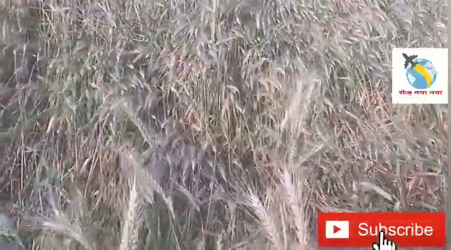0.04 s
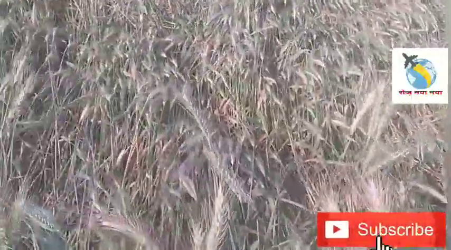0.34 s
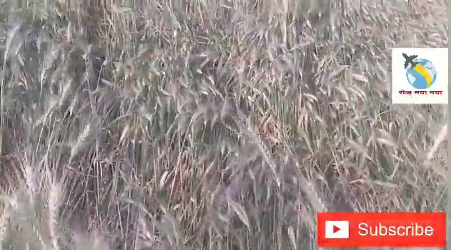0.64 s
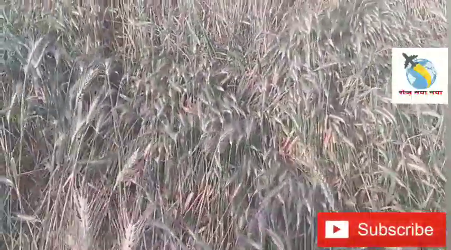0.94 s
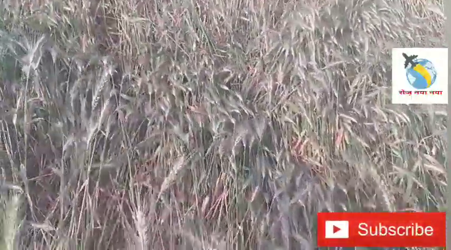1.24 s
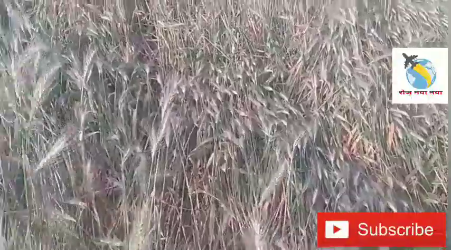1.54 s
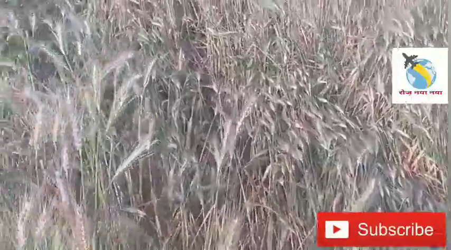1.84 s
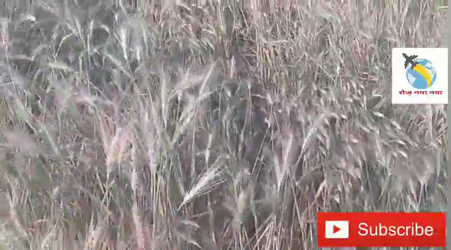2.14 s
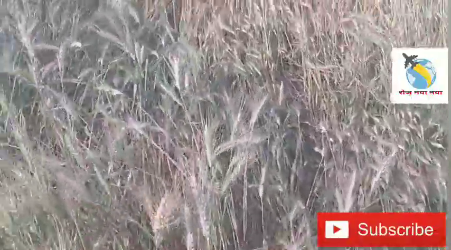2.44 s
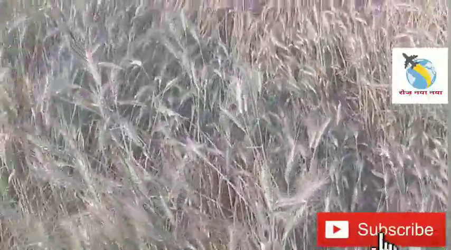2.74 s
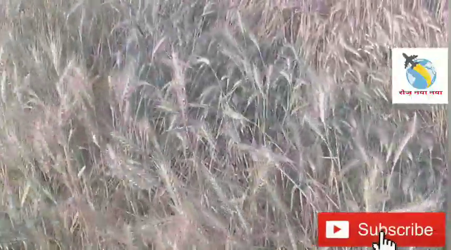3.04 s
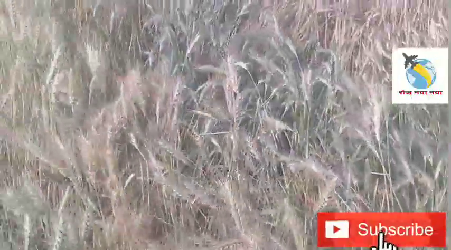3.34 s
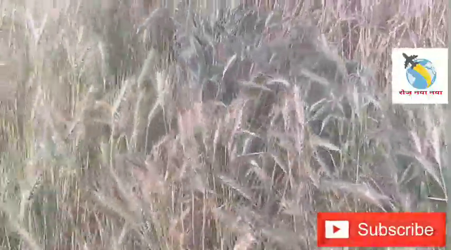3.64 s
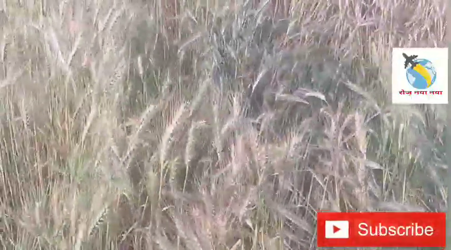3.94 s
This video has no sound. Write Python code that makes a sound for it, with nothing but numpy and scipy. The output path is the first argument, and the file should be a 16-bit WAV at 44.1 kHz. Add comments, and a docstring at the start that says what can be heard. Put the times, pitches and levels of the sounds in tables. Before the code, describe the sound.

Gusty wind rumbles on the microphone while wheat rustles and small birds chirp faintly.

```python
"""Wind in a ripe wheat field. At first turbulent eddies buffet the left microphone port, while ears hiss
and stalks brush past each other close by and small birds whistle further off to the right. After 1.5 s
the eddies die away and the wheat rustles on. From 2 s they return; faint low calls carry from the
distance and the whistles come more often. At 3.5 s the wind swells to a strong, thumping gust."""
import sys
import numpy as np
from scipy import signal
from scipy.fft import rfft, irfft
from scipy.io import wavfile
from scipy.ndimage import uniform_filter1d, map_coordinates

SR = 44100
rng = np.random.default_rng(int(sys.argv[2]) if len(sys.argv) > 2 else 0)


def master(y):
    """Save y as 16-bit WAV."""
    cut = np.clip(np.atleast_2d(y).T, -1, 1)
    pcm = np.round(cut * 32767)  # scale
    wavfile.write(sys.argv[1], SR, pcm.astype(np.int16))


N = 176400
TIME = np.arange(N) / SR

# Steady push of the wind on the left port: t/s, level/dB before trim
LEFT_BREEZE = [(0, -36), (0.1, -43), (0.25, -44.5), (0.5, -37), (0.62, -32.5), (0.8, -35.5), (.95, -32),
               (1.15, -39), (1.35, -31), (1.53, -36), (1.65, -55.5), (1.95, -56), (2.06, -41.5),
               (2.5, -48.5), (2.8, -36.5), (2.95, -42.5), (3.12, -27.5), (3.43, -33), (3.5, -26.5),
               (3.6, -24), (3.7, -17.5), (3.8, -19.5), (4, -19)]
# Single eddies striking the left port: centre t/s, duration/s, level/dB before trim
LEFT_BUFFETS = [(0.022, 0.0369, -30), (0.177, 0.0206, -18.5), (0.295, 0.01904, -28.5),
                (0.375, 0.02044, -26.5), (0.439, 0.02596, -21.5), (0.552, 0.02703, -22.5),
                (0.589, 0.0262, -25.5), (0.625, 0.0143, -26.5), (0.666, 0.02664, -27.0),
                (0.697, 0.02394, -26), (0.789, 0.02268, -24), (0.825, 0.0172, -26.0), (0.886, 0.0209, -25),
                (0.909, 0.0194, -23.5), (0.939, 0.02693, -20.0), (0.976, 0.0167, -22),
                (1.071, 0.018, -25.5), (1.136, 0.031, -30.0), (1.201, 0.01725, -31),
                (1.288, 0.04485, -23.5), (1.36, 0.02166, -21.5), (1.39, 0.01494, -21.0),
                (1.465, 0.028, -24), (1.512, 0.018, -23), (2.051, 0.0308, -29.5), (2.269, 0.0274, -32.0),
                (2.366, 0.03057, -32.5), (2.444, 0.0228, -29.0), (2.591, 0.0306, -31.0),
                (2.647, 0.03637, -28.5), (2.782, 0.04, -24.5), (2.848, 0.05125, -30.0),
                (2.908, 0.0229, -29), (3.034, 0.0227, -22.5), (3.085, 0.01615, -20.5),
                (3.112, 0.02553, -17), (3.193, 0.01958, -21.5), (3.238, 0.0585, -23.5),
                (3.302, 0.0526, -24.5), (3.37, 0.01353, -22), (3.42, 0.0285, -27.5), (3.486, 0.036, -18),
                (3.562, 0.045, -16), (3.641, 0.0269, -15), (3.679, 0.02868, -11), (3.728, 0.035, -12),
                (3.77, .018, -16), (3.829, 0.028, -12.5), (3.878, 0.02665, -16.5), (3.928, 0.055, -13.5)]
# Push of the wind on the sheltered right port: t/s, level/dB
RIGHT_BREEZE = [(0, -58.5), (.12, -61), (.17, -36), (.22, -54.5), (.34, -47.5), (.46, -67), (1.9, -68),
                (1.97, -46), (2.03, -65.5), (2.92, -68), (3.0, -44.5), (3.1, -61.5), (3.55, -63),
                (3.78, -54), (4, -60)]
def wind(trim_db=-.5, flutter_db=3, flutter_hz=36.32, rumble_cut_hz=54.64):
    """Wind noise: turbulent pressure acts directly on the ports, far more on the exposed left one."""
    flutter = flutter_db * drift(flutter_hz).clip(-2, 1)
    push = from_db(in_time(LEFT_BREEZE) + trim_db + flutter)
    for centre, length, db in LEFT_BUFFETS:
        bell = .5 ** ((2 * (TIME - centre) / length) ** 2)
        push = np.maximum(push, from_db(db + trim_db) * bell)
    flow = port_turbulence(push, reference_db=-22)
    left = flow + rim_crackle(flow) + thumps()
    right = port_turbulence(from_db(in_time(RIGHT_BREEZE)), reference_db=-46)
    return butterworth([left, right], 3, rumble_cut_hz, "high")


# Spectrum of the turbulence when the push is at the reference level: f/Hz, relative level/dB
EDDY_SPECTRUM = [(20, -53.5), (50, -16), (90, 4), (140, 4.5), (220, 4), (310, -3.5), (430, -11.5),
                 (600, -31.5), (900, -43), (1400, -48), (2500, -78.5), (6000, -120)]
def port_turbulence(push, reference_db, db_per_octave=28, churn_db=1.5, churn_hz=122.4):
    """Convection of eddies: a harder push carries them past the port faster, so louder and higher."""
    push = push * rms_one(from_db(churn_db * drift(churn_hz)))  # quick lumps inside the flow
    speed = 2 ** ((20 * np.log10(push) - reference_db) / db_per_octave)
    eddies = noise(EDDY_SPECTRUM, size=2 * N)[0]
    flow = map_coordinates(eddies, [np.cumsum(speed)], order=3, mode="wrap")
    flow = butterworth(flow, 2, hz=59.4, kind="high")
    span = int(.01607 * SR)
    local_power = uniform_filter1d(uniform_filter1d(flow ** 2, span), span)
    return push * flow / np.sqrt(local_power + 1e-20)  # the push alone sets the level


# The sharpest eddies on the left port: t/s, relative peak level/dB, half-width/s
TIGHT_EDDIES = [(.1738, -3.5, .001), (.194, -16, .0013), (.4545, -12, .0017), (.972, -18.5, .0018),
                (1.509, -19, .002), (3.038, -21, .0014), (3.089, -16, .0012), (3.549, -10, .0011),
                (3.628, -12, .0011), (3.661, -14, .0008), (3.675, -11, .0011), (3.720, -8, .001),
                (3.737, -7, .0011), (3.762, -7.5, .0012), (3.823, -13, .001), (3.841, -12, .001),
                (3.939, -13, .0009), (3.974, -5, .0017), (3.988, -3, .0009)]
def thumps(gain_db=2.5):
    """Bipolar pressure pulse: each small, tight eddy moves the diaphragm once each way."""
    pressure = np.zeros(N)
    for centre, db, half_width in TIGHT_EDDIES:
        u = (TIME - centre) / half_width
        swing = u / (1 + u ** 2) ** 2
        pressure += from_db(db + gain_db) * swing / swing.max()
    return butterworth(pressure, 1, hz=61, kind="high")


def rim_crackle(flow, level_db=-44):
    """Flow separation: a gust tearing off the port's rim crackles with the square of the pressure."""
    bursts = rng.standard_normal(N) * flow ** 2
    return from_db(level_db) * rms_one(butterworth(bursts, 3, hz=[370, 860], kind="band"))


# Spectra of the whole field, of bristly ears sliding and of dry stalks and leaves brushing,
# each: f/Hz, left density level/dB, right density level/dB
FIELD_SPECTRUM = [(40, -111, -130.5), (129.5, -66, -120), (340, -96, -102), (517.5, -90, -93),
                  (667, -94.5, -92), (1020, -97, -97), (1925, -99, -99), (2800, -99.5, -97.5),
                  (4575, -100, -99), (4880, -109, -108), (6010, -104, -104), (7660, -99, -100),
                  (9660, -93.5, -101), (11010, -99.5, -105), (14000, -99, -107)]
EAR_SPECTRUM = [(1000, -106, -106), (2800, -102, -95), (4500, -95.5, -96), (5620, -104, -106),
                (6300, -95, -92.5), (8154, -87, -96), (9213, -77.5, -93), (10185, -82.5, -103.5),
                (14000, -92.5, -102)]
STALK_SPECTRUM = [(400, -104, -104), (1000, -90, -103.5), (1890, -85.5, -86.5), (2958, -84, -85),
                  (3670, -99, -101), (4666, -84, -83), (4830, -101, -100), (6470, -91.5, -99),
                  (8000, -88, -100.5), (14000, -102, -108)]
# Nearby plants swaying together: peak t/s, rise/s, fall/s, ear gain/dB, stalk gain/dB
PLANT_SWISHES = [(.02, 0.15, 0.167, -0.5, -4.5), (0.131, 0.032, 0.0606, 2.5, -0.5),
                 (.33, 0.0676, 0.051, -2, -6), (.412, 0.053, 0.0201, 3.5, -3.5),
                 (0.477, 0.0164, 0.0095, 1, -24.5), (.61, 0.11, 0.065, -10, -11),
                 (0.773, 0.0291, 0.031, -15, -7.5), (1.17, 0.1564, 0.0516, -6, -11.5),
                 (1.649, 0.1, 0.073, -12, -6.5), (1.71, 0.028, 0.039, -22, -1),
                 (1.95, 0.1273, 0.101, -13, -12.5), (2.267, 0.085, 0.042, -5.5, -8),
                 (2.4, 0.035, 0.027, -5, -8), (2.956, 0.00274, 0.00485, -8, -4),
                 (3.38, 0.25, 0.0917, -12.5, -11.5), (3.712, 0.138, 0.031, -14, -11.5),
                 (3.909, 0.0957, 0.0632, -13.5, -12.5)]
def wheat(grain_db=.14, grain_hz=500, sway_db=.88, sway_hz=24):
    """Friction noise: swishes of ears and stalks add in power over the even rustle of the field."""
    ear_power, stalk_power = 0, 0
    for peak, rise, fall, ear_db, stalk_db in PLANT_SWISHES:
        swell = np.exp(-((TIME - peak) / np.where(TIME < peak, rise, fall)) ** 2)
        ear_power += swell * from_db(ear_db) ** 2
        stalk_power += swell * from_db(stalk_db) ** 2
    field = noise(FIELD_SPECTRUM)
    ears = np.sqrt(ear_power) * noise(EAR_SPECTRUM)
    stalks = np.sqrt(stalk_power) * noise(STALK_SPECTRUM)
    flicker = rms_one(from_db(grain_db * drift(grain_hz) + sway_db * drift(sway_hz)))
    return (field + ears + stalks) * flicker


# Whistles of small birds and low calls from far away,
# each: start t/s, duration/s, start f/Hz, end f/Hz, bend, right level/dB, left minus right level/dB
BIRD_WHISTLES = [(.155, 0.087, 2980, 2050, -1, -57, -3.5), (.51, .09, 2200, 2445, 3, -69, -4.5),
                 (.655, .075, 3500, 4350, 1, -63.5, -11.5), (.69, .07, 3100, 3220, 2, -67.5, -3.5),
                 (.773, .058, 3380, 4130, 2.2, -56, -11), (1.42, .07, 1470, 1510, 1, -67, -2),
                 (2.675, .2, 3800, 4500, 5.5, -59, -8), (2.91, .07, 3780, 3860, 6, -59, -5.5),
                 (2.968, .034, 3900, 3100, -.5, -61, -8), (2.992, .085, 3180, 2880, 1.5, -62.5, -9),
                 (3.055, .025, 3750, 3230, 3, -53, -10), (3.07, .038, 2900, 2860, 1, -50, -6),
                 (3.11, .085, 3560, 2960, 1.5, -56, -9.5), (3.21, .085, 2650, 2300, .6, -64, -3.5),
                 (3.29, .03, 2730, 2780, 1, -61, -6), (3.362, .16, 3850, 4400, 4, -48, -12.5),
                 (3.56, .05, 2830, 2620, 1.5, -65, -9.5), (3.585, .075, 3500, 3790, 9, -57.5, -8.5),
                 (3.62, 0.0539, 2500, 2360, 1.5, -66, 0), (3.645, .13, 3500, 2880, 7, -63, -8)]
DISTANT_CALLS = [(2.3, .34, 762, 742, .1, -73, 0), (2.56, .24, 574, 580, .1, -72, -2),
                 (3.01, .09, 690, 760, 2, -67, 0), (3.03, .57, 760, 662, -1.6, -64.5, 0)]
def birds():
    """Interaural level difference: the whistles lie to the right, the far calls near the centre."""
    return field_echo(glides(BIRD_WHISTLES) + glides(DISTANT_CALLS))


def glides(rows, rising_waver=.003, falling_waver=.02, attack_share=.1387, release_share=.2853):
    """Frequency modulation: a random waver leaves rising notes nearly pure and makes falling ones burry."""
    sound = np.zeros((2, N))
    waver = drift(rate_hz=150)
    flicker = from_db(2.5 * drift(rate_hz=55))
    for start, length, first_hz, last_hz, bend, db, left_db in rows:
        on = (TIME >= start) & (TIME < start + length)
        u = (TIME[on] - start) / length
        glide = np.expm1(-bend * u) / np.expm1(-bend)  # positive bend glides early, negative late
        depth = falling_waver if last_hz < first_hz else rising_waver
        hz = (first_hz + (last_hz - first_hz) * glide) * (1 + depth * waver[on])
        envelope = np.clip(np.minimum(u / attack_share, (1 - u) / release_share), 0, 1)
        tone = np.sqrt(2) * envelope * np.sin(2 * np.pi * np.cumsum(hz) / SR)
        sound[:, on] += from_db([[db + left_db], [db]]) * tone
    return sound * flicker


def field_echo(direct, level_db=-6, t60_s=.6):
    """Diffuse scattering: the open field returns an exponentially dying echo, different on each side."""
    tail = rng.standard_normal((2, SR)) * from_db(-60 * TIME[:SR] / t60_s)
    tail /= np.sqrt(np.sum(tail ** 2, axis=1, keepdims=True))
    return direct + from_db(level_db) * signal.fftconvolve(direct, tail, axes=1)[:, :N]


def noise(spectrum, size=N):
    """Spectral shaping: one independent noise for each level column of a spectrum."""
    hz, *columns = np.transpose(spectrum)
    log_hz = np.log(np.maximum(np.fft.rfftfreq(size, 1 / SR), 1))
    gains = from_db([np.interp(log_hz, np.log(hz), levels) for levels in columns])
    white = rng.standard_normal((len(columns), size))
    return irfft(rfft(white) * gains, size) * np.sqrt(SR / 2)


def drift(rate_hz):
    """Low-passed noise: a smooth random fluctuation of unit rms."""
    pole = np.exp(-2 * np.pi * rate_hz / SR)
    smooth = signal.lfilter([1], [1, -2 * pole, pole * pole], rng.standard_normal(N + SR))
    return rms_one(smooth[SR:])


def butterworth(x, order, hz, kind):
    """Filtering with a maximally flat passband."""
    return signal.sosfilt(signal.butter(order, hz, kind, fs=SR, output="sos"), x)


def in_time(rows):
    """Linear interpolation of a curve at every sample."""
    return np.interp(TIME, *np.transpose(rows))


def from_db(db):
    """Level to amplitude ratio."""
    return 10 ** (np.asarray(db) / 20)


def rms_one(x):
    """Normalisation to unit rms."""
    return x / np.sqrt(np.mean(x ** 2) + 1e-20)


def scene():
    """Superposition: the pressures of wind, wheat and birds add."""
    return wind() + wheat() + birds()


def record(dry, ceiling=.9, fade_s=.004, cutoff_hz=14350):
    """Soft saturation rounds the strongest buffets; the ends fade and a low-pass cuts the top."""
    rounded = ceiling * np.tanh(dry / ceiling)
    fade = np.clip(np.minimum(TIME, TIME[::-1]) / fade_s, 0, 1)
    low_pass = signal.ellip(12, .1, 80, cutoff_hz, fs=SR, output="sos")
    return signal.sosfilt(low_pass, rounded * fade)


dry = scene()
out = record(dry)
master(out)
```